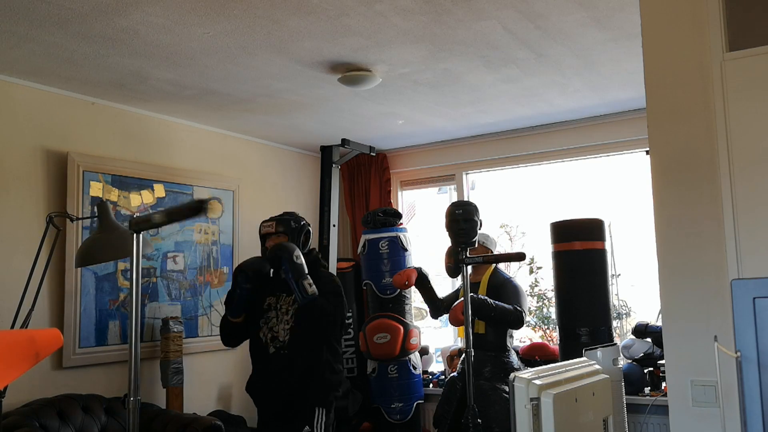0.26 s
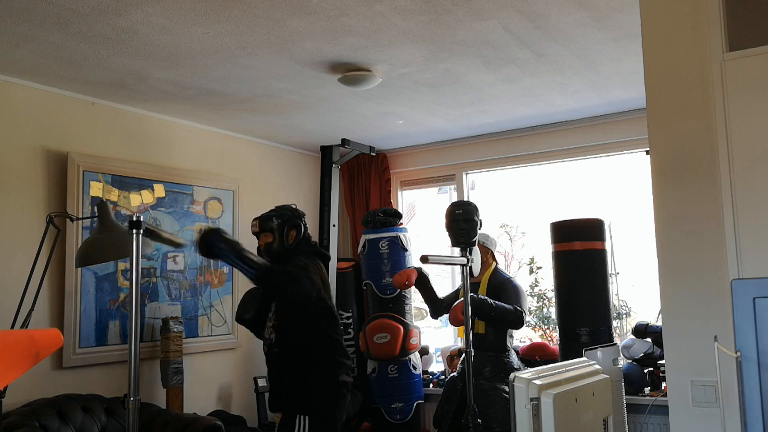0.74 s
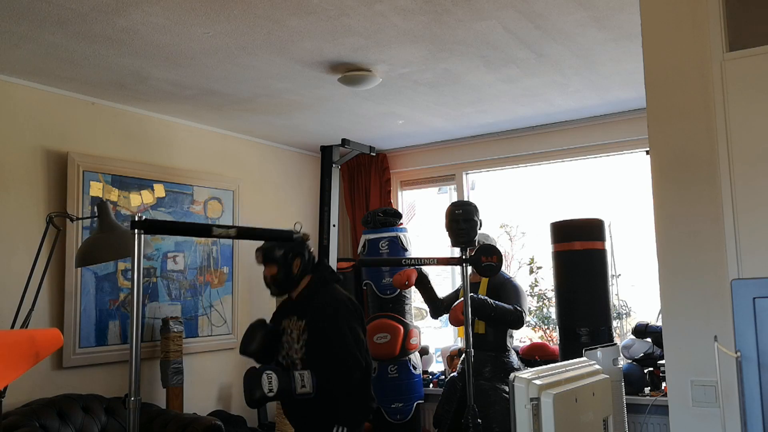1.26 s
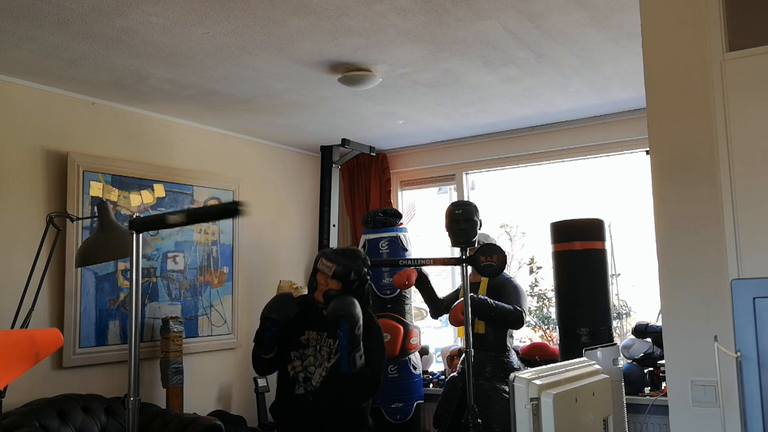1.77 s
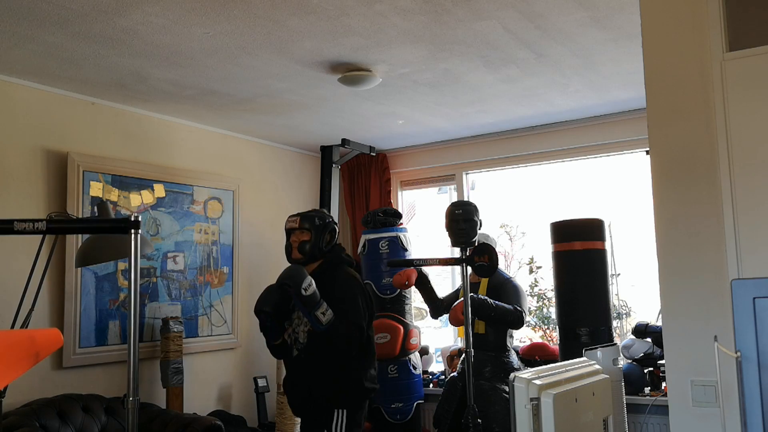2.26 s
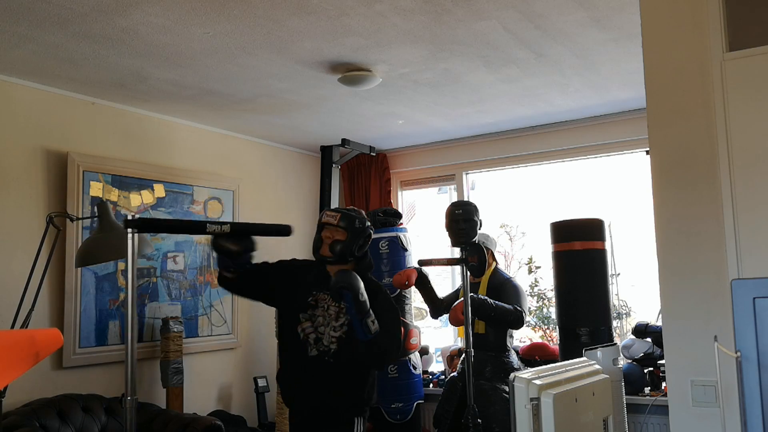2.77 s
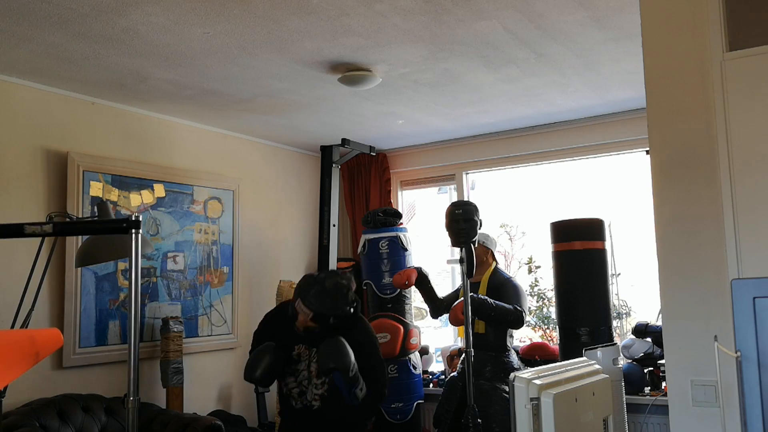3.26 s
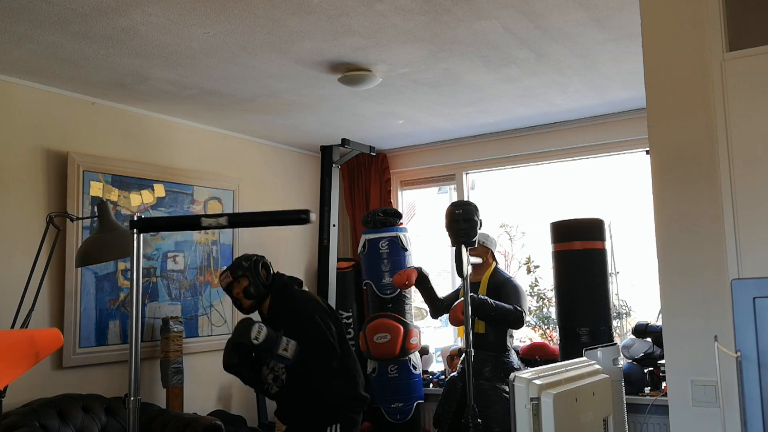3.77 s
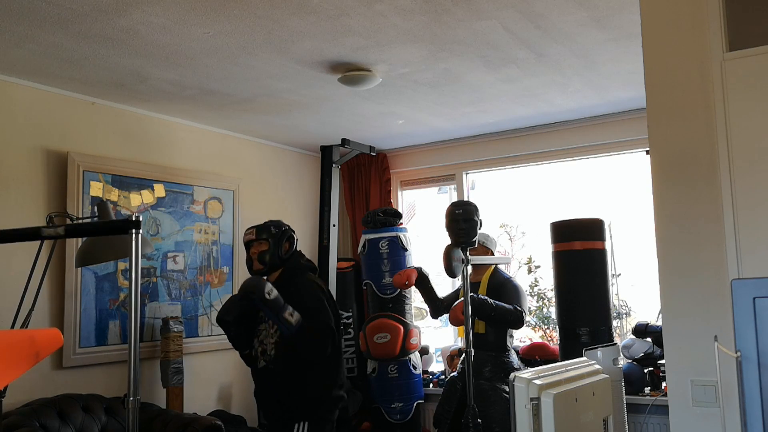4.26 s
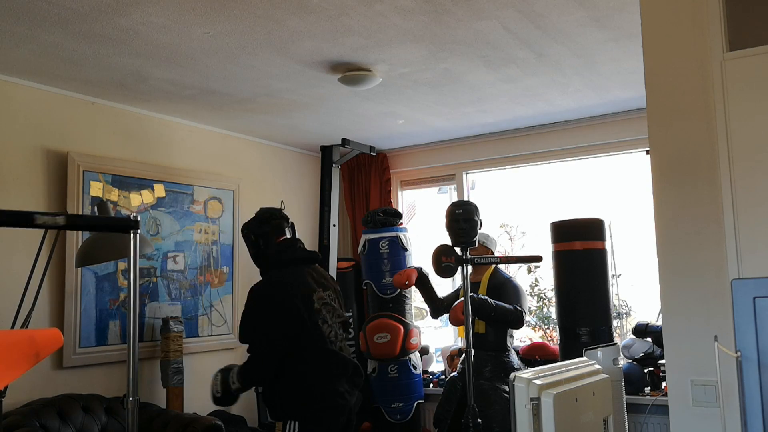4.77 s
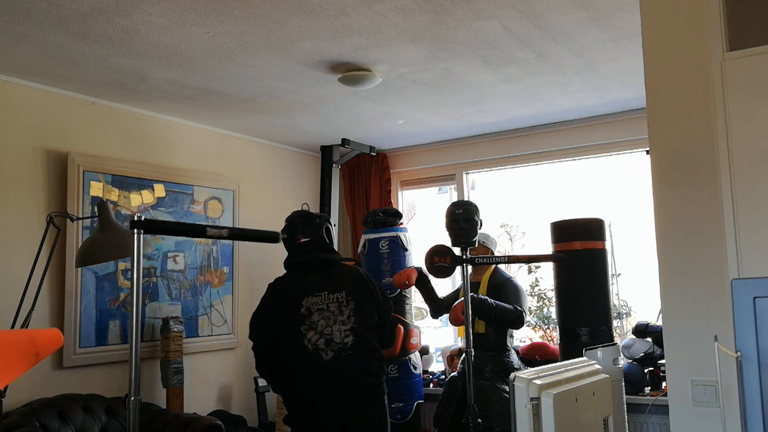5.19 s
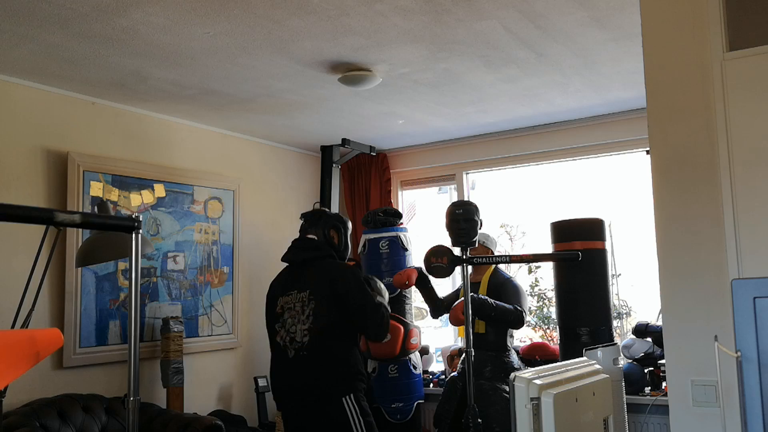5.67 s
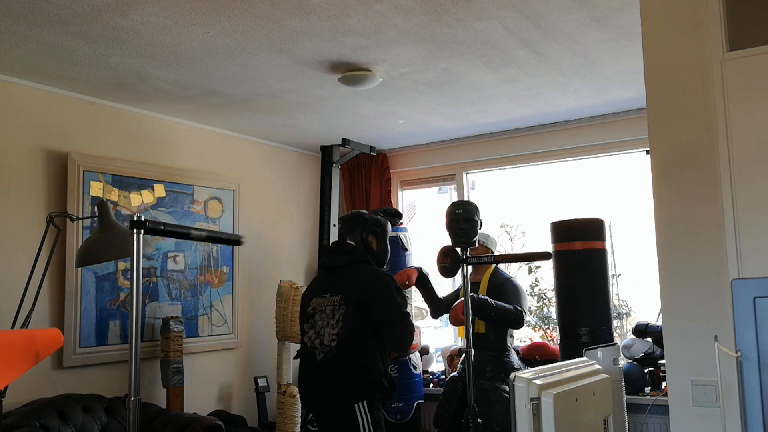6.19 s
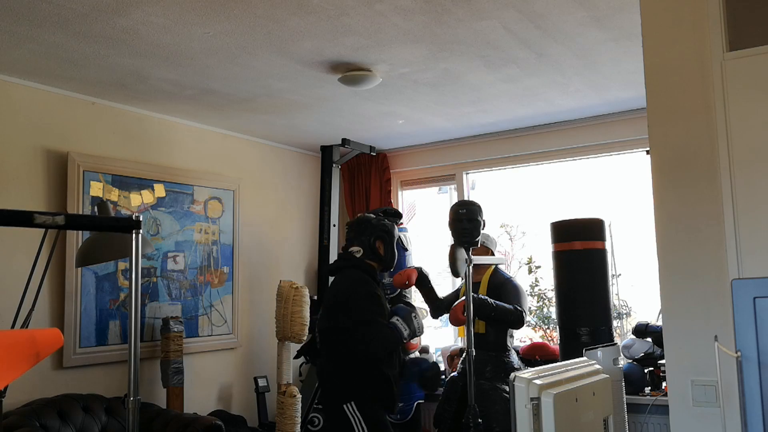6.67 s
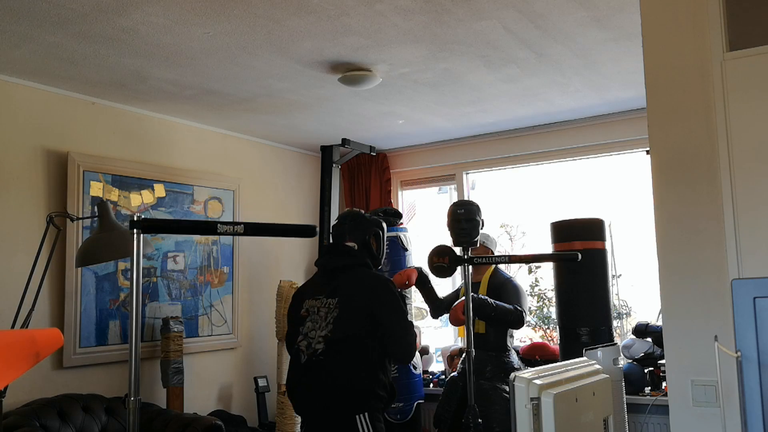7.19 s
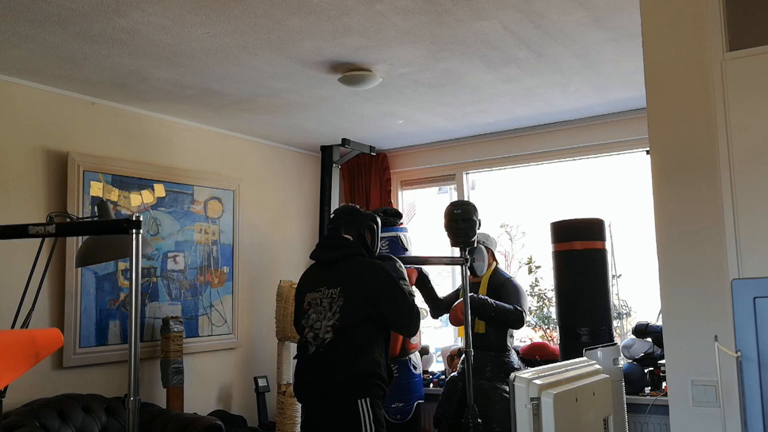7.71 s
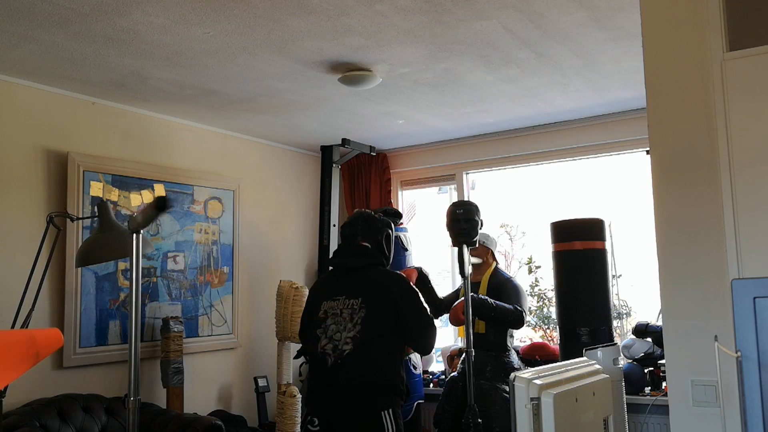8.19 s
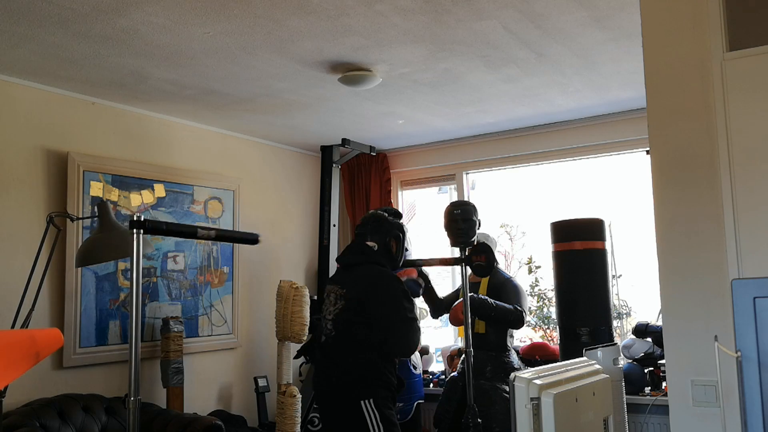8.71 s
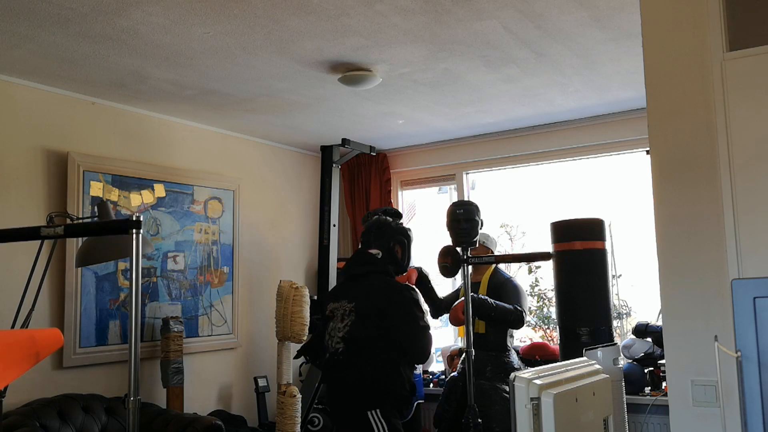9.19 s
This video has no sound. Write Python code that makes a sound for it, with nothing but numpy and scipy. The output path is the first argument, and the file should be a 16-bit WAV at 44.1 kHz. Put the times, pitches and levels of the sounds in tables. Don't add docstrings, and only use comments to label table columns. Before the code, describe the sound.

Hard gloved punches smack padded bags every couple of seconds, stands thudding on the floor, with light taps, cloth rustles and brief shoe squeaks between.

```python
import sys
import numpy as np
from scipy import signal
from scipy.fft import rfft, irfft, next_fast_len
from scipy.io import wavfile
from scipy.ndimage import uniform_filter1d

SR = 44100
rng = np.random.default_rng(int(sys.argv[2]) if len(sys.argv) > 2 else 0)


def transcribe(u):
    v = np.clip(np.atleast_2d(u).T, -1, 1)
    q = np.round(v * 32767).astype(np.int16)
    wavfile.write(sys.argv[1], SR, q)


def nominal_scale(level):
    x = np.asarray(level, float) / 20
    return 10 ** x


N = 416744
SIZE = next_fast_len(N)
FREQ = np.arange(SIZE // 2 + 1) * SR / SIZE


def colour(points):
    hz, db = np.transpose(points)
    return nominal_scale(np.interp(np.log(FREQ + 1), np.log(np.array(hz) + 1), db))


def unit(x):
    return x / np.sqrt(np.mean(x ** 2))


def walk(rate, size=N):
    count = int(size * rate // SR + 2)
    return np.interp(np.arange(size) * rate / SR, np.arange(count), rng.standard_normal(count))


def resonances(modes):
    return sum(nominal_scale(db) * 1j * FREQ * width / (hz ** 2 - FREQ ** 2 + 1j * FREQ * width)
               for hz, width, db in modes)


def diffuse(gain, spacing_m=0.291):
    wall_lag = 26.5
    a, b = rfft(rng.standard_normal((2, SIZE)))
    wall_share = 0.16 * np.clip(FREQ / 500, 0, 1)
    all_round = np.sinc(2 * FREQ * spacing_m / 343)
    side_wall = np.exp(2j * np.pi * FREQ * wall_lag / SR)
    alike = (1 - wall_share) * all_round + wall_share * side_wall
    pair = np.array([a, alike * a + np.sqrt(np.abs(1 - np.abs(alike) ** 2)) * b])
    return unit(irfft(pair * gain, SIZE)[:, :N])


# t/s, slap peak level/dB, left minus
# right level/dB, left lag/samples, push level/dB
CONTACTS = [(0.8025, -28, 2, 15.5, -62), (1.1574, -16.5, 4, -5.5, -20), (1.585, -41, -3.0, 7, -62),
            (2.525, -45, -9, 14, -66), (2.699, -42, 3, 5, -70), (3.024, -45, 0, 3, -57),
            (0.8075, -37, 0, 14.5, -70), (3.157, -18.5, 5, -4, -29), (4.288, -57, 2, -11, -64),
            (4.8865, -15, -2.5, -4.5, -35), (5.472, -31, -1, -6, -52), (5.4769, -40, 2, 9, -70),
            (5.534, -38, 0, 0, -70), (5.847, -39, 0, -2, -61), (6.266, -56, -1.5, 6, -53),
            (6.596, -47, -1, 1, -55), (6.8395, -23, -2, -9.5, -35), (6.881, -21, -3, 1, -26),
            (7.147, -33, 0, 0.5, -40), (7.5208, -44, -3, -8, -49), (8.168, -35, -1, 9, -52),
            (8.6, -47, -10, -10, -61), (8.947, -27, -3, -3.5, -25.5), (9.305, -45, -1, -23, -56)]
# delay t/s, level/dB, extra left lag/samples
FIRST_ECHOES = [(.0022, -1, 0.5), (.0030, -9, 21), (.0047, -10, -14), (.0094, -2, -8.5), (.0130, -12, 34),
                (.0172, -10, -35.5), (.0230, -12, 20.5)]


def slaps():
    dips, pushes = np.zeros((2, SIZE)), np.zeros(SIZE)
    t = np.arange(400) / SR
    pad = np.e * t / 0.000065 * np.exp(-t / 0.000087)
    edge_tone = np.sin(2 * np.pi * 7400 * t) + 0.16 * np.sin(2 * np.pi * 12500 * t)
    edge = np.e * t / 0.00007 * np.exp(-t / 0.00007) * edge_tone
    push = np.hanning(int(0.0041 * SR))
    scatter = rng.standard_normal((len(CONTACTS), len(FIRST_ECHOES)))
    for (s, db, pan_db, lag, push_db), row in zip(CONTACTS, scatter):
        dip = -pad - edge * nominal_scale(db + 17)
        arrivals = [(0.00031, 0, 0)]
        for (delay, echo_db, more), r in zip(FIRST_ECHOES, row):
            arrivals.append((delay * (1 + 0.022 * r), echo_db + 0.75 * r, more))
        for delay, echo_db, more in arrivals:
            for side, sign in enumerate((1, -1)):
                at = int((s + 0.001 + delay) * SR + sign * (lag + more) / 2)
                dips[side, at:at + len(t)] += dip * nominal_scale(db + echo_db + sign * pan_db / 2 - 8.5)
        start = int(s * SR)
        pushes[start:start + len(push)] -= push * nominal_scale(push_db + 1)
    bag = resonances([(96, 50, -5.5), (150, 124, -0.5), (261, 150, -28)])
    thud = irfft(rfft(pushes) * bag, SIZE)
    return (dips + thud)[:, :N]


# t/s, rise t/s, level/dB, fall/(dB/s)
COVER_HITS = [(0, 0.017, -33.5, 222), (1.159, 0.0088, -37.5, 135), (3.159, .01, -41, 102),
              (3.335, .006, -44, 160), (4.887, 0.0073, -41, 120), (6.884, .006, -41, 200),
              (8.943, 0.0044, -39.5, 200), (0.803, 0.011, -52, 142), (1.64, .05, -54, 108),
              (2.526, 0.0057, -62, 150), (2.725, .03, -61, 100), (3.766, .02, -52, 158),
              (4.292, .011, -48.5, 30), (5.474, .004, -49, 208), (5.848, .004, -43, 205),
              (6.841, .002, -42, 250), (7.148, .004, -46.5, 190), (8.168, .002, -58, 250),
              (8.599, .004, -57, 196)]
# f/Hz, width/Hz, level/dB
PUNCHED_COVERS = [
    [(762, 58, -2.5), (990, 51, -2), (1680, 36, -5), (2290, 25, -5), (3500, 120, -2.5), (5540, 93, -5)] + [(980, 600, -2.5)],
    [(930, 49, -3), (1410, 65, -3), (1860, 84, -0.5), (2270, 56, -3), (2780, 35, 1), (3300, 42, -0.5)] + [(1100, 400, -8)],
    [(1100, 170, -9), (1380, 26, -13), (1840, 54, 7), (2320, 75, -6), (2620, 74, 1), (3300, 42, -14)],
    [(795, 44, 0.5), (1310, 31, -1), (1800, 57, 0), (2180, 47, -4)],
    [(1060, 310, -2), (1410, 34, -4), (1920, 110, -1), (2270, 110, -2), (2780, 60, 3), (3980, 180, -8)],
    [(1000, 38, -9), (1600, 53, 2), (1840, 32, -7), (2080, 39, 2), (3700, 100, -11)],
    [(1010, 40, -3), (1200, 65, -5), (1740, 110, -4), (2240, 120, 1.5), (2430, 180, 1), (3630, 29, -8)] + [(322, 82, 2)],
]
# f/Hz, width/Hz, level/dB
TAPPED_COVERS = [[(460, 36, 7), (2020, 100, -5), (2790, 270, -0.5), (3250, 28, -6)] + [(3900, 1600, -1),
                 (1000, 260, -4)], [(1160, 38, -9), (1910, 55, -2), (2210, 120, 1)], [(1420, 81, 1),
                 (1990, 39, 1.5)], [(1900, 28, 3), (2160, 38, -5)], [(4830, 2900, 8), (7450, 1600, -13)],
                 [(2025, 180, -0.5), (3130, 59, -6), (3440, 58, -8)] + [(1250, 690, -8)], [(1140, 68, -4),
                 (2040, 89, -3), (2650, 78, -3), (2830, 79, -5)], [(800, 37, -4.5), (1070, 41, -5.5),
                 (1540, 92, -2), (2227, 69, 0.5)], [(1670, 68, -14), (1950, 180, 2), (2760, 110, -6)],
                 [(1390, 120, -5), (2010, 200, -5), (2540, 39, 2), (3620, 23, 0)] + [(4120, 1300, -7)],
                 [(1850, 170, 0), (2130, 51, 0), (2730, 170, -3)], [(1340, 66, -5), (1644, 37, 3),
                 (1900, 35, -5)]]


def singing_covers():
    let_go_s, lift = 0.23, 1.67
    out, t = np.zeros((2, N + SR)), np.arange(SR // 2) / SR
    grid = np.arange(len(t) // 2 + 1) * SR / len(t)
    for (s, rise_s, db, fall_db), bands in zip(COVER_HITS, PUNCHED_COVERS + TAPPED_COVERS):
        gain = sum(nominal_scale(lift * band_db) / (1 + (2 * (grid - hz) / width) ** 2) for hz, width, band_db in bands)
        noise = unit(irfft(rfft(rng.standard_normal((2, len(t)))) * gain, len(t)))
        rise = 1 - np.exp(-(t + 0.0012) / rise_s)
        fall = nominal_scale(db - fall_db * t - 270 * np.maximum(t - let_go_s, 0))
        start = int(s * SR)
        out[:, start:start + len(t)] += noise * rise * fall
    return out[:, :N]


# t/s, peak level/dB, floor f/Hz, time to fall 60 dB t/s
STAND_LANDINGS = [(0.014, -16.5, 44.8, .12), (.035, -12.5, 80.5, 0.063), (.062, -17, 35.9, 0.22),
                  (.128, -25, 29.2, 0.44), (.21, -26, 45.5, 0.4), (1.16, -20, 115, 0.07),
                  (1.49, -28, 32.2, 0.28), (1.201, -18, 55.5, 0.11), (1.247, -11, 50.5, 0.16),
                  (1.308, -18, 59.4, 0.15), (1.352, -14.5, 55.5, 0.21), (1.386, -20.5, 34.8, 0.29),
                  (3.046, -32.5, 54.4, 0.21), (3.257, -12, 55.5, 0.2), (3.346, -17.5, 46.3, 0.21),
                  (3.401, -15, 57.2, 0.24), (3.482, -20.5, 33, 0.26), (4.894, -24, 107.6, 0.16),
                  (4.911, -15, 55, 0.16), (4.966, -17.5, 38.3, 0.26), (5.033, -15, 48.6, 0.15),
                  (5.117, -17.5, 55.65, 0.12), (5.201, -23, 42.8, 0.21), (6.904, -17.5, 60.3, 0.094),
                  (6.935, -17, 54, 0.1), (6.982, -27.5, 30.5, 0.43), (7.07, -28, 41.3, 0.11),
                  (8.98, -17, 61.6, 0.16), (3.55, -34.5, 76, .3), (9.04, -36, 35.3, 0.17),
                  (9.155, -36, 60.8, 0.36)]
# t/s, peak level/dB, f/Hz, time to fall 60 dB t/s
BAG_KNOCKS = [(.01, -41.5, 261.4, 0.39), (1.251, -22, 135, 0.06), (1.315, -26, 150, 0.22),
              (3.193, -16.5, 139.4, 0.16), (3.17, -30.5, 288, .15), (3.324, -33.5, 250, 0.29),
              (4.925, -28, 150, 0.082), (4.985, -27, 135, 0.078), (6.919, -20, 138, 0.068),
              (6.884, -20, 104, 0.11), (9.03, -33, 136, .2), (2.53, -57, 170, .3),
              (5.476, -51, 184.5, 0.29), (5.852, -49, 150, 0.3), (6.842, -36, 173, 0.13),
              (7.152, -48, 150, 0.35), (7.524, -53, 164.5, 0.22), (8.172, -53, 174, 0.25),
              (8.603, -52, 140, 0.17)]


def thumps():
    out, t = np.zeros(SIZE + SR), np.arange(SR // 2) / SR
    for s, db, hz, t60 in STAND_LANDINGS + BAG_KNOCKS:
        cycles = hz * (t + 0.003 * (1 - np.exp(-t / 0.027)))
        loudness = (1 - np.exp(-t / 0.0051)) * nominal_scale(db + 0.5 - 60 * t / t60)
        start = int(s * SR)
        out[start:start + len(t)] -= loudness * np.sin(2 * np.pi * cycles)
    return out[:N]


def ring(rows, column, shape, crack=0):
    power, t = np.zeros(N + SR), np.arange(SR) / SR
    late_share, rise_s, sag_db, drop_db = shape
    for row in rows:
        s, held_s = row[0], row[3]
        db = row[column] - sag_db * np.minimum(t, held_s) - drop_db * np.maximum(t - held_s, 0)
        late = np.clip(late_share, 0, 0.99) * np.exp(-t / rise_s) * (s > 0)
        start = int(s * SR)
        power[start:start + SR] += nominal_scale(2 * db) * (1 - late + crack * np.exp(-t / 0.0016))
    return power[:N]


# peak t/s, rise t/s, fall t/s, wash level/dB, leather hiss level/dB
CLOTH_RUSTLES = [(0.251, 0.078, 1, -63.5, -71), (1.13, 0.59, 0.2, -67, -84), (1.68, 0.11, 0.16, -46, -65.5),
                 (1.77, 0.13, 0.11, -56, -68.5), (1.95, 0.11, 0.14, -67, -89), (2.46, 0.16, 0.15, -67, -76),
                 (2.82, 0.11, 0.24, -43, -56), (3.01, 0.044, 0.12, -54.5, -61),
                 (3.795, 0.14, 0.15, -60, -67), (4.27, 0.083, 0.2, -61, -75), (4.73, 0.12, 0.2, -63.5, -80),
                 (4.87, 0.11, 0.072, -70, -68.5), (5.45, 0.37, 0.18, -60.5, -67.5),
                 (6.24, 0.32, 0.23, -62, -71), (6.39, 0.23, .12, -52, -58.5), (7.59, 0.067, 0.11, -59, -61),
                 (7.75, 0.14, 0.25, -60, -92), (8.27, 0.056, 0.63, -62, -74),
                 (8.45, 0.19, 0.21, -65.5, -72), (9.22, 0.017, 0.22, -60.5, -84),
                 (9.32, 0.17, 0.055, -63.5, -72)]


def rustles(column):
    depth_db = 23
    t = np.arange(N) / SR
    power = np.zeros(N)
    for row in CLOTH_RUSTLES:
        peak_s, rise_s, fall_s = row[:3]
        away = np.maximum((peak_s - t) / rise_s, (t - peak_s) / fall_s)
        power += nominal_scale(2 * (row[column] - depth_db * away))
    return power


def knocked(rows):
    return [(s, wash_db + knock_db, hiss_db, held_s) for s, wash_db, hiss_db, held_s, knock_db in rows]


# t/s, wash level/dB, leather hiss level/dB, held t/s, knock level/dB
PUNCH_ANSWERS = [(0.0, -39, -43, 0.17, -1), (1.158, -34, -38, 0.21, 2), (1.335, -42.5, -50.5, 0.13, 0.5),
                 (1.455, -49, -50, 0.019, -13), (3.158, -34, -39.5, 0.15, 2), (3.2, -37, -42, 0.12, 0),
                 (3.335, -39, -46.5, 0.16, 0.5), (3.475, -45.5, -50.5, 0.029, -9),
                 (4.886, -35, -37, 0.3, 1.5), (5.195, -55.5, -59, 0.014, -16),
                 (6.882, -35.5, -38.5, 0.09, 1), (8.938, -37.5, -44, .005, 7),
                 (8.943, -39, -39.5, 0.085, -3)]
# t/s, wash level/dB, leather hiss level/dB, held t/s, knock level/dB
TAP_ANSWERS = [(.803, -46, -71, 0.069, -2.5), (1.586, -53.5, -77.5, 0.1, 7), (2.525, -63, -88, 0.06, 6),
               (2.7, -64, -59, 0.1, -1), (2.865, -57, -70, .04, 7), (3.023, -44, -53, 0.027, 0.5),
               (3.763, -58.5, -56.5, 0.043, -11), (4.288, -43, -54, 0.18, -4),
               (5.472, -49, -66, 0.067, -1.5), (5.847, -45, -58, 0.053, -4),
               (6.267, -51, -61.5, 0.088, 3.5), (6.597, -58, -73, 0.19, 4.5),
               (6.839, -40.5, -58, 0.025, -7), (7.147, -43.5, -61.5, 0.095, 0),
               (7.522, -53, -68.5, 0.13, -1.5), (7.62, -53.5, -79, 0.047, 2.5),
               (8.169, -56.5, -81, 0.05, 0), (8.601, -56.5, -95, 0.054, 6), (9.306, -63.5, -77, 0.037, 2.5)]
# t/s, floor boom level/dB, bag body level/dB, held t/s
PUNCH_LOWS = [(0.0, -27, -34.5, 0.2), (1.158, -31.5, -30.5, 0.065), (1.245, -30, -29, 0.25),
              (3.158, -31.5, -26.5, 0.14), (3.25, -23, -28.5, 0.11), (3.335, -33, -30, 0.048),
              (3.395, -29.5, -39.5, 0.13), (4.886, -26.5, -26, 0.37), (6.885, -30.5, -33.5, 0.095),
              (8.939, -41, -32, 0.058), (8.975, -28, -50, 0.091)]
# t/s, floor boom level/dB, bag body level/dB, held t/s
TAP_LOWS = [(.803, -53, -51, 0.098), (1.6, -43, -44, 0.089), (1.7, -39, -50, 0.033),
            (2.526, -71, -60.5, 0.17), (2.7, -51.5, -80, 0.022), (2.82, -45, -49, 0.18),
            (3.03, -41.5, -54, 0.12), (3.64, -48.5, -65, 0.29), (3.765, -70, -59, 0.066),
            (4.35, -64, -81, 0.084), (5.473, -52, -52, 0.11), (5.848, -52, -48.5, 0.07),
            (6.268, -54, -49.5, .19), (6.598, -65, -54, 0.27), (6.839, -40, -39.5, .05),
            (7.148, -42.5, -41.5, 0.13), (7.521, -58, -54, 0.1), (7.62, -63, -58, 0.056),
            (8.169, -59.5, -54.5, 0.065), (8.6, -56, -47.5, 0.074), (9.17, -38, -50, 0.024),
            (9.3, -50.5, -86, 0.11)]
# share that builds up late [0-1], rise t/s, sag while held/(dB/s), drop after/(dB/s)
PUNCH_WASH_SHAPE, PUNCH_HISS_SHAPE = (1.24, 0.018, 74, 149), (0.78, 0.011, 89, 170)
TAP_WASH_SHAPE, TAP_HISS_SHAPE = (0.74, 0.0088, 24, 210), (0.93, 0.041, 45, 214)
PUNCH_FLOOR_SHAPE, PUNCH_BODY_SHAPE = (.9, 0.03, 36.6, 135), (0.75, 0.0063, 90, 148)
TAP_FLOOR_SHAPE, TAP_BODY_SHAPE = (0.93, 0.057, 21, 122), (1.3, 0.024, 74, 360)
QUIET_LEVELS = [-70.5, -79.5, -71.5, -84.5, -72.5]


def layer_levels():
    cloth = rustles(column=3)

    def wash(punches, taps):
        opening_crack = nominal_scale(1)
        return ring(punches, 1, PUNCH_WASH_SHAPE) + ring(taps, 1, TAP_WASH_SHAPE, opening_crack) + cloth

    hiss = ring(PUNCH_ANSWERS, 2, PUNCH_HISS_SHAPE) + ring(TAP_ANSWERS, 2, TAP_HISS_SHAPE)
    powers = [ring(PUNCH_LOWS, 1, PUNCH_FLOOR_SHAPE) + ring(TAP_LOWS, 1, TAP_FLOOR_SHAPE),
              ring(PUNCH_LOWS, 2, PUNCH_BODY_SHAPE) + ring(TAP_LOWS, 2, TAP_BODY_SHAPE),
              wash(PUNCH_ANSWERS, TAP_ANSWERS),
              hiss + rustles(column=4),
              wash(knocked(PUNCH_ANSWERS), knocked(TAP_ANSWERS))]
    return np.array([10 * np.log10(power + nominal_scale(2 * (db + 2.5 * walk(8))))
                     for power, db in zip(powers, QUIET_LEVELS)])


def eased(db, rise_s):
    keep = np.exp(-1 / (rise_s * SR))
    return 20 * np.log10(signal.lfilter([1 - keep], [1, -keep], nominal_scale(db)))


def steadied(x, hold_s, depth):
    span = int(hold_s * SR)
    power = uniform_filter1d(uniform_filter1d(np.mean(x ** 2, axis=0), span), span)
    return unit(x / np.maximum(power, 1e-4) ** (depth / 2))


# f/Hz, width/Hz, level/dB
FLOOR_MODES = [(27.7, 4.6, -5.5), (38.9, 19, -3.5), (50.3, 3.6, -2.5), (57.4, 6.1, -3), (77.4, 33, -8)]
# f/Hz, width/Hz, level/dB
CORE_MODES = [(94, 50, -0.5), (110.6, 20, 7), (125.4, 19, -17)]
# f/Hz, width/Hz, level/dB
PADDING_MODES = [(142.9, 26, 0.5), (180, 25, -11.5), (227.6, 42, -8.5), (263.6, 26, -14), (398, 41, -21)]


def low_ring(boom_db, body_db):
    floor = resonances(FLOOR_MODES) * colour([(15, -38), (26, 14.5), (80, 1.5), (140, -24.5)])
    core = resonances(CORE_MODES) * colour([(50, -21), (85, 13.5), (140, -2), (250, -20)])
    padding = resonances(PADDING_MODES) * colour([(70, -22), (130, 5), (400, -7), (600, -8)])
    boom = steadied(diffuse(floor, spacing_m=0.12), hold_s=0.05, depth=0.34)
    bag = steadied(diffuse(core, spacing_m=0.099), hold_s=0.03, depth=0.51)
    pad = steadied(diffuse(padding, spacing_m=0.216), hold_s=0.017, depth=0.9)
    hard = np.clip((body_db + 71.5) / 30, 0, 1)
    body = bag * nominal_scale(body_db - 9 + 9.1 * hard) + pad * nominal_scale(body_db - 2.5 - 1.66 * hard)
    return boom * nominal_scale(boom_db) + body


def patchy(spectrum, centres_hz, levels_db, patchy_db, rate, ripple_db):
    ripple = nominal_scale(ripple_db * walk(69.88, size=len(FREQ)))
    whole = rfft(diffuse(colour(spectrum) * ripple), SIZE)
    place = np.interp(np.log(FREQ + 1), np.log(centres_hz), np.arange(len(centres_hz)))
    out = np.zeros((2, N))
    for k, level_db in enumerate(levels_db):
        band = irfft(whole * np.clip(1 - np.abs(place - k), 0, 1), SIZE)[:, :N]
        out += band * nominal_scale(level_db + patchy_db * walk(rate))
    return out


# f/Hz, level/dB per Hz
WASH_TONE = [(160, -25), (280, -11), (332, -9), (397, -7), (636, -11.5), (819, -5), (1050, -5.5),
             (1400, -7.5), (2050, -1), (2870, -6.5), (3900, -16.5), (5000, -22), (6500, -31), (11000, -120)]
# f/Hz, level/dB per Hz
HISS_TONE = [(2060, -24.5), (3500, 1), (4560, -8.5), (5100, 0), (6280, -4), (7120, -1), (9320, -4),
             (11400, -31), (14500, -34), (15000, -37), (15350, -36), (15500, -74)]


def wash_and_hiss(body_db, wash_db, hiss_db, knock_db):
    low_db = knock_db - 0.5 + 0.11 * np.clip(body_db - wash_db + 1, -30, 6)
    chest_db = (wash_db + knock_db) / 2 + 0.257 + 0.4 * np.clip(body_db - wash_db + 3, -35, 5)
    middle_db = (low_db + knock_db) / 2 + 0.13
    top_db = wash_db + 0.93 * np.clip(hiss_db - wash_db + 15, -30, 6)
    rim_db = hiss_db + 0.31 * np.clip(wash_db - hiss_db - 4, -3, 25)
    air_db = hiss_db + 14.5 + 0.57 * np.clip(hiss_db + 38.5, -12, 3)
    wash = patchy(WASH_TONE, [400, 750, 1200, 1800, 2500, 3500, 4700],
                  [chest_db, low_db, middle_db, wash_db, wash_db, wash_db, top_db],
                  patchy_db=2, rate=24, ripple_db=2.5)
    hiss = patchy(HISS_TONE, [5500, 9000, 12000], [rim_db, hiss_db, air_db],
                  patchy_db=1.5, rate=25, ripple_db=2)
    crackle_db = 1.2 * walk(400)
    flutter_db = 1.5 * walk(40) + 0.1 * walk(150)
    return (wash + hiss * nominal_scale(crackle_db)) * nominal_scale(flutter_db)


def room_answer():
    levels_db = layer_levels()
    boom_db, body_db = eased(levels_db[:2], rise_s=0.0016)
    wash_db, hiss_db, knock_db = eased(levels_db[2:], rise_s=0.00009)
    return low_ring(boom_db, body_db) + wash_and_hiss(body_db, wash_db, hiss_db, knock_db)


# t/s, length t/s, start f/Hz, end f/Hz, level/dB
RUBS = [(1.447, 0.077, 1800, 2010, -52.5), (1.759, 0.044, 2004, 1800, -54), (2.53, 0.14, 1900, 1950, -68),
        (2.716, 0.14, 1830, 2573, -50), (3.463, 0.058, 1834, 1840, -50), (4.285, 0.21, 2080, 2050, -54),
        (6.842, 0.04, 1800, 1990, -49), (2.725, 0.088, 1830, 1600, -53), (1.655, .05, 1400, 1300, -53),
        (8.6, .07, 900, 1030, -65), (7.625, 0.049, 2000, 2300, -52), (6.05, 0.12, 2220, 3100, -69),
        (6.126, 0.19, 3270, 4170, -60), (8.27, 0.26, 2200, 1900, -65)]


def scrapes():
    out = np.zeros((2, N))
    for s, length, hz0, hz1, db in RUBS:
        width_hz = 340 * (hz1 / 2000) ** 3
        count = int(length * SR)
        turns = 2 * np.pi * np.cumsum(np.linspace(hz0, hz1, count)) / SR
        slips = np.array([walk(width_hz, size=count) for _ in range(4)])
        band = slips[:2] * np.cos(turns) + slips[2:] * np.sin(turns)
        start = int(s * SR)
        out[:, start:start + count] += band * signal.windows.tukey(count, 0.35) * nominal_scale(db)
    return out


# f/Hz, level/dB per Hz
HOUSE_AIR = [(13, -32), (22, 8.5), (53, 1.5), (97, -11), (147, -5.5), (193, -14), (612, -24), (784, -18.5),
             (2050, -24), (4310, -25), (9310, -31), (13700, -37.5), (15700, -36)]


def room_tone():
    return diffuse(colour(HOUSE_AIR)) * nominal_scale(-66.5 + 0.29 * walk(3.41))


def scene():
    return slaps() + singing_covers() + thumps() + room_answer() + scrapes() + room_tone()


def band_limit(x):
    return signal.sosfilt(signal.butter(12, 15850, fs=SR, output="sos"), x)


# f/Hz, left minus right level/dB
MICROPHONE_LEAN = [(300, -0.5), (700, -1.5), (1500, -2.5), (4000, -1.5), (8000, 0), (13000, -7)]


def record(dry):
    top_hz, reach = 15850, 2048
    lean = colour(MICROPHONE_LEAN) ** (np.clip(FREQ / 300, 0, 1) ** 2 / 2)
    response = irfft(np.array([lean, 1 / lean]) * (FREQ < top_hz), SIZE)
    taps = np.roll(response, reach, axis=1)[:, :2 * reach + 1] * np.hanning(2 * reach + 1)
    padded = np.pad(dry, ((0, 0), (reach, reach)), mode="reflect")
    return band_limit(signal.oaconvolve(padded, taps, "valid", axes=1))


dry = scene()
out = record(dry)
transcribe(out)
```